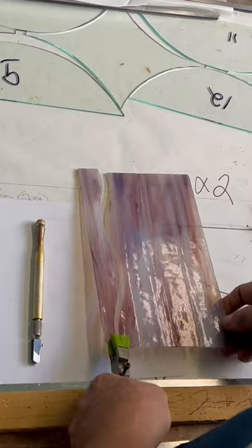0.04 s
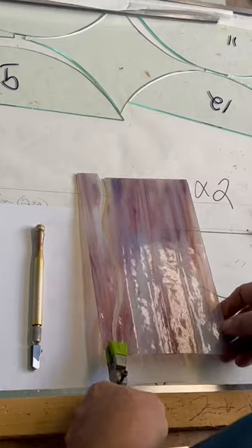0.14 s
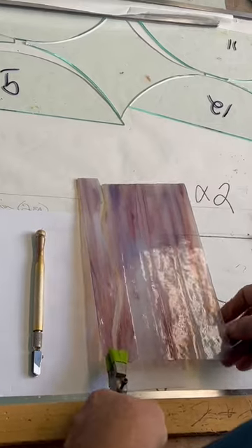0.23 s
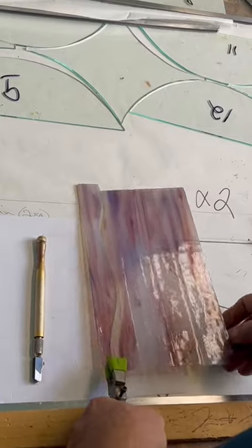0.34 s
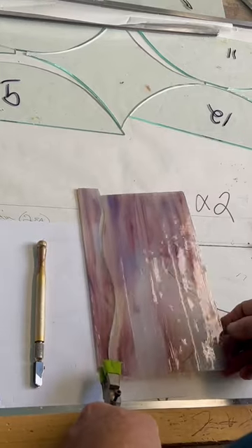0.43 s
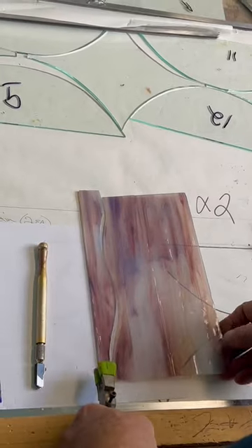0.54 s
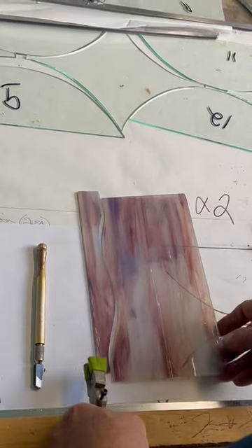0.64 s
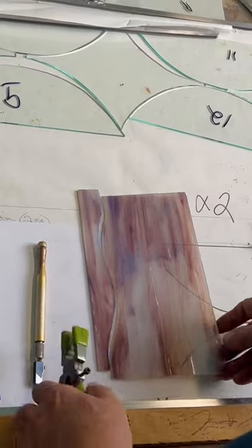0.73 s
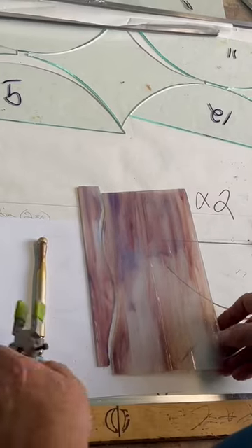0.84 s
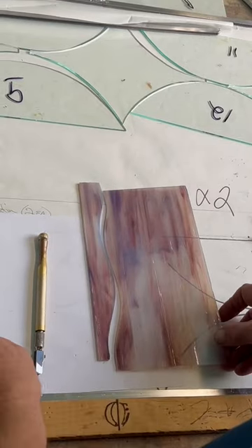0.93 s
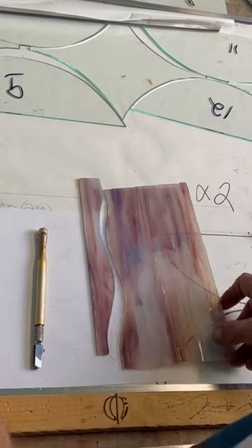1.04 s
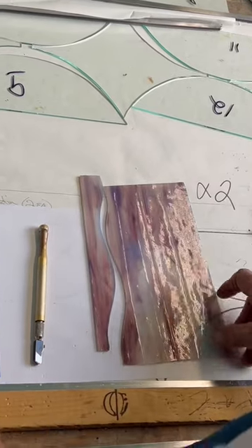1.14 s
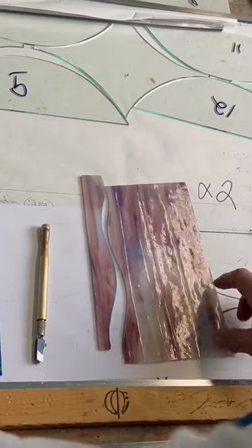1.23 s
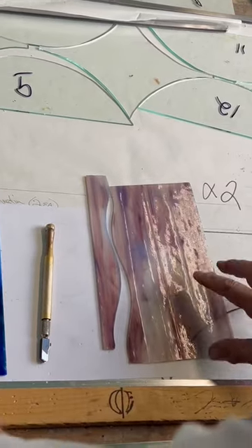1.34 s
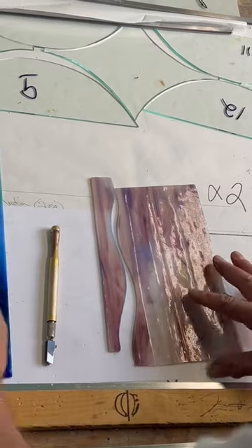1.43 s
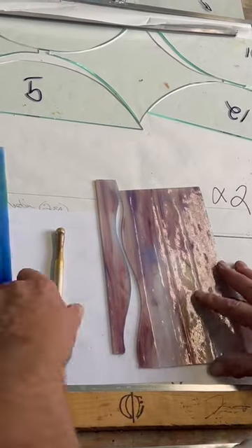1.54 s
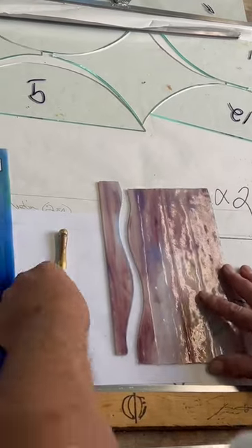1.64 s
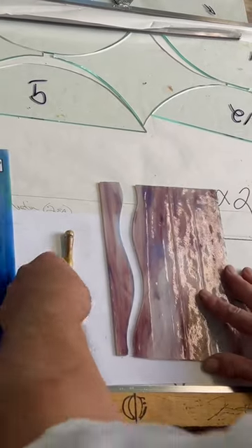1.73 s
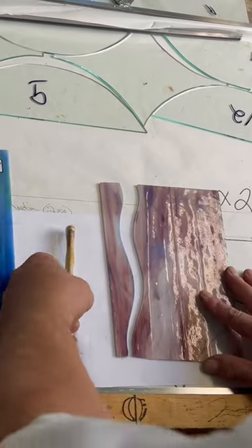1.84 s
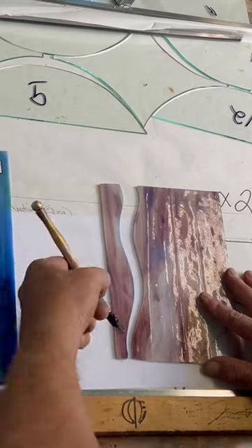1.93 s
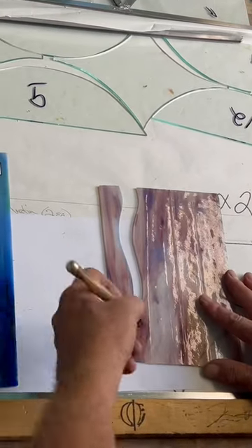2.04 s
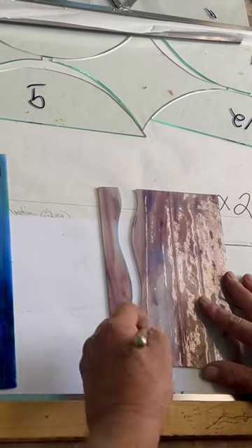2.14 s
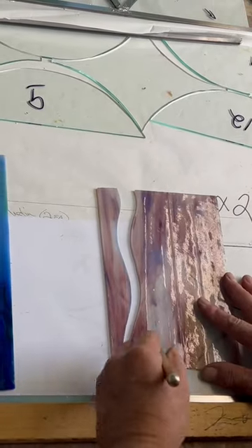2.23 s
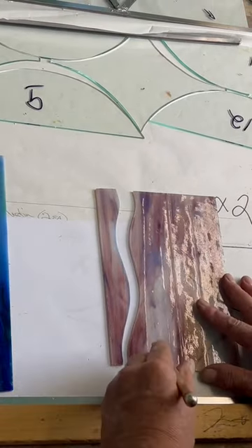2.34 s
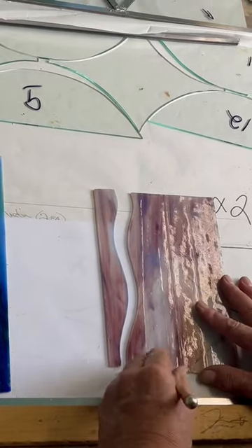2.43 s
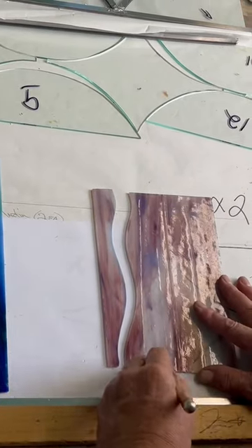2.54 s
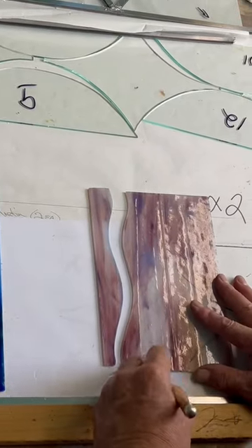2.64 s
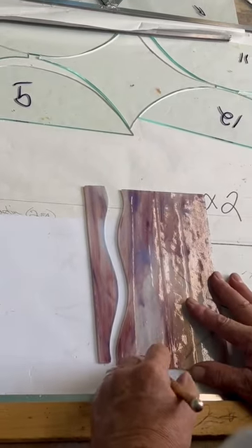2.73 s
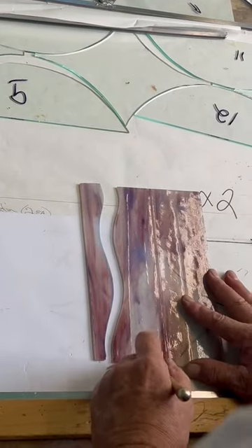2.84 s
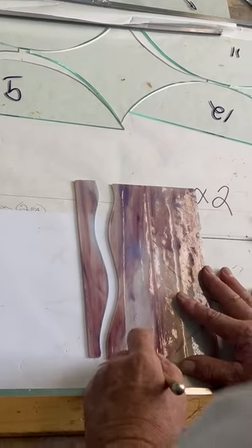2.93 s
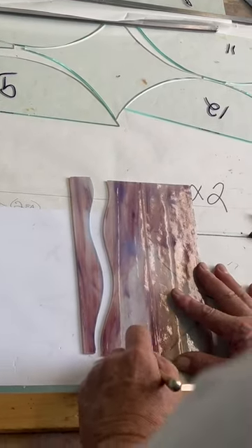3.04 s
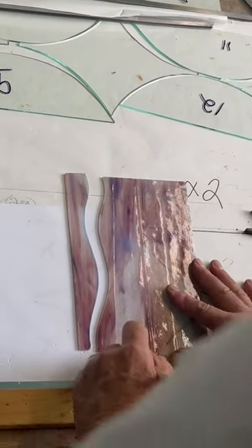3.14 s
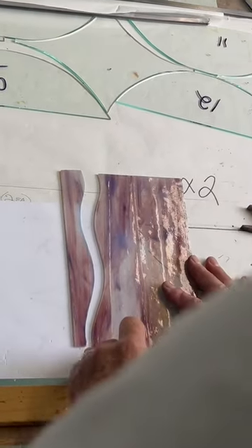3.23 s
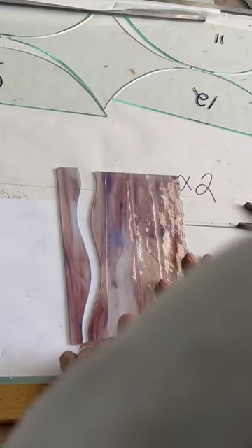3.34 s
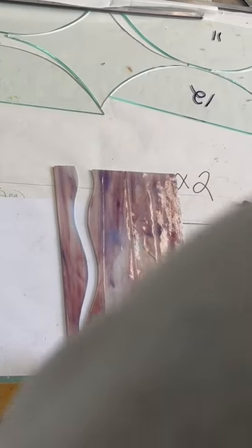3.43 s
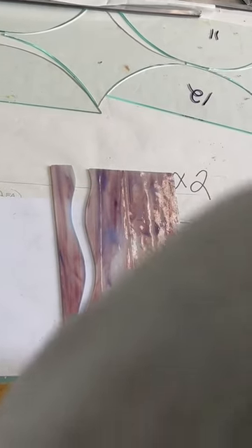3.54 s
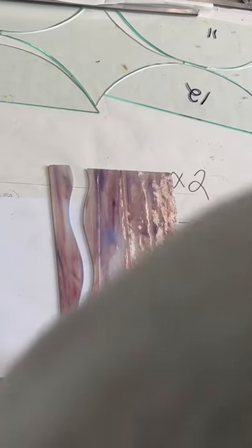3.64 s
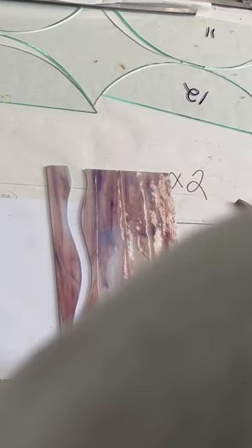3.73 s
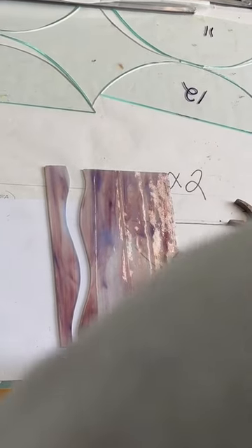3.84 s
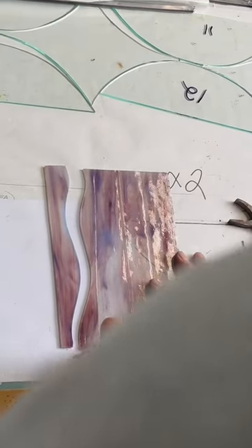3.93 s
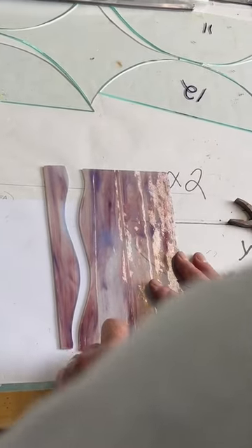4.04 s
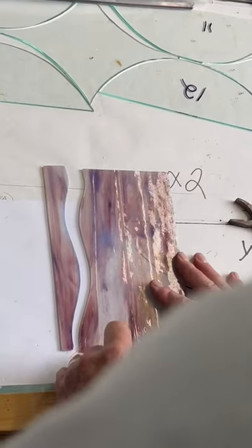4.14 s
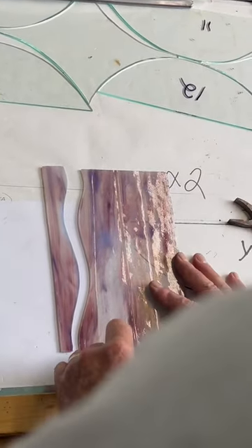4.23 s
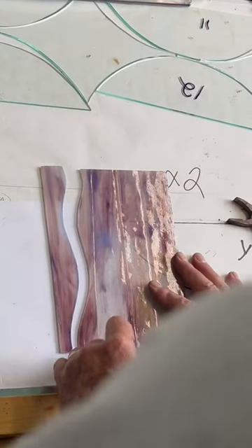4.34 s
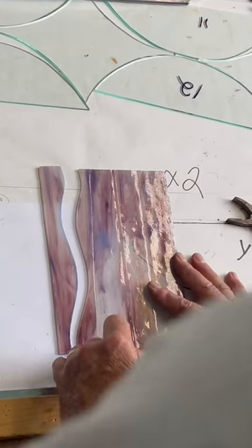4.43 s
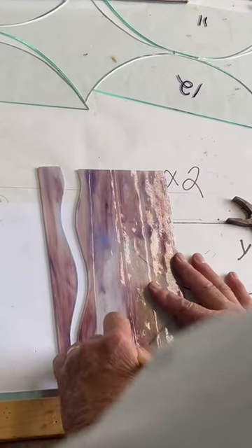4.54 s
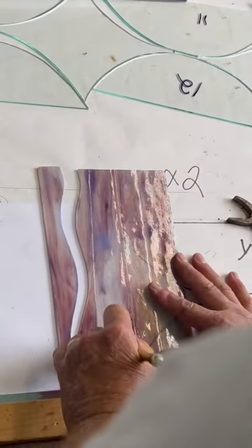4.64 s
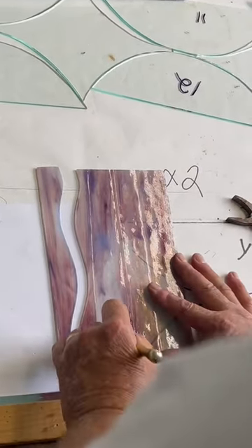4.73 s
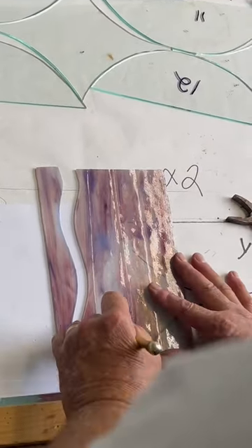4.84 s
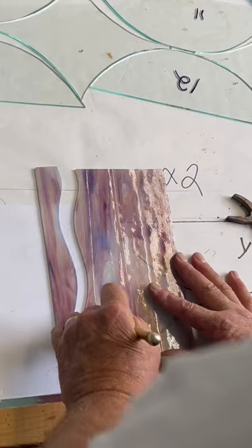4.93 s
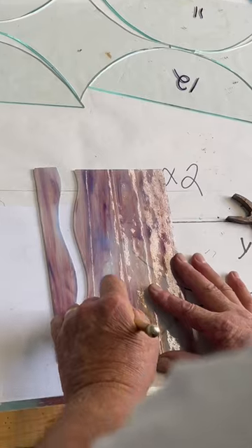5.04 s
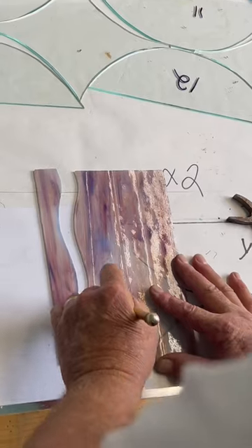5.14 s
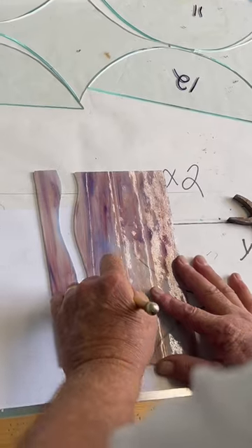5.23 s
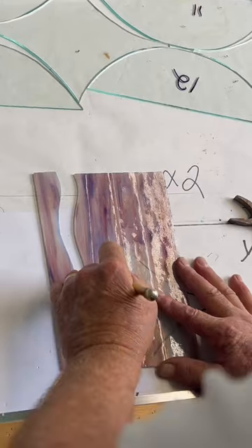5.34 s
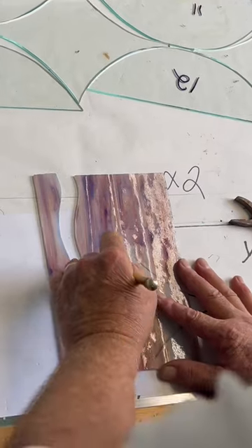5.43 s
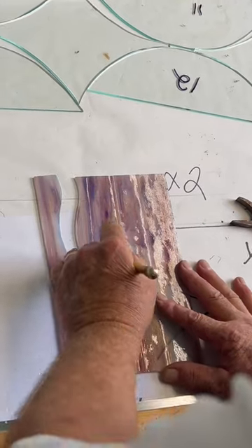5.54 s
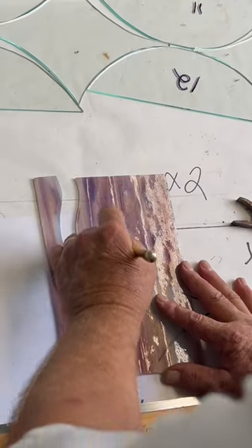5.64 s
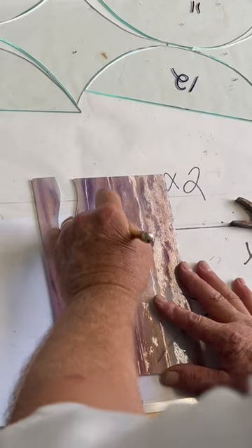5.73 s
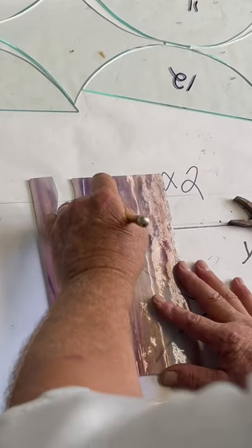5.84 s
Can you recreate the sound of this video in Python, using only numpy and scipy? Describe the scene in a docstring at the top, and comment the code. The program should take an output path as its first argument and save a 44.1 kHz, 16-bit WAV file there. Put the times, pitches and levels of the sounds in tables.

```python
"""Scoring stained glass

On a paper-covered wooden bench, steel pliers are put down and ring; the sheet slides, then drops flat
with a knock. A cutter is picked up and set on the edge with sharp clicks and one hard snap. Its wheel
is pushed across the sheet, crushing a fine score line: a gritty hiss, coloured by the modes of the
glass, over a rolling rumble. The small workshop echoes and hums low."""
import sys
import numpy as np
from scipy import signal
from scipy.fft import rfft, irfft
from scipy.io import wavfile
from scipy.ndimage import uniform_filter1d

SR = 44100
rng = np.random.default_rng(int(sys.argv[2]) if len(sys.argv) > 2 else 0)


def put_to_file(sound):
    """Save the sound as 16-bit audio at rate SR, in the file named by the first command-line argument."""
    columns = np.atleast_2d(sound).T  # one column per channel
    safe = np.clip(columns, -1, 1)
    whole_steps = np.round(safe * 32767)
    wavfile.write(sys.argv[1], SR, whole_steps.astype(np.int16))


N = 259308
TIME = np.arange(N) / SR
STROKE_START_S = 4.456   # the wheel bites


def from_db(db):
    """Decibels to gain."""
    return 10 ** (np.asarray(db) / 20)


def rms_one(x):
    """Scale to rms 1."""
    return x / np.sqrt(np.mean(x ** 2) + 1e-20)


def at_hz(points, hz):
    """Interpolate (f, value) points over log frequency."""
    f, value = np.transpose(points)
    return np.interp(np.log(np.maximum(hz, 1)), np.log(f), value)


def colour(x, spectrum):
    """Shape steady noise with a spectrum; rms 1."""
    gain = from_db(at_hz(spectrum, np.fft.rfftfreq(N, 1 / SR)))
    return rms_one(irfft(rfft(x) * gain, N))


def butter(x, kind, hz, order=2):
    """Butterworth low- or high-pass."""
    return signal.sosfilt(signal.butter(order, hz, kind, fs=SR, output="sos"), x + 1e-18)


def add(track, s, sound):
    """Mix a short sound in at time s."""
    part = track[round(s * SR):][:len(sound)]
    part += sound[:len(part)]


def ring(x, hz, t60_s):
    """One mode: a unit impulse starts a decaying sine of height 1."""
    r, w = from_db(-60 / (t60_s * SR)), 2 * np.pi * hz / SR
    return signal.lfilter([0, np.sin(w)], [1, -2 * r * np.cos(w), r * r], x + 1e-18)


def resonance(x, hz, width_hz):
    """Band-pass, peak gain 1."""
    r, w = np.exp(-np.pi * width_hz / SR), 2 * np.pi * hz / SR
    numerator = np.array([1, 0, -1]) * (1 - r * r) / 2
    return signal.lfilter(numerator, [1, -2 * r * np.cos(w), r * r], x + 1e-18)


def diffuse(size):
    """White stereo noise, alike left and right in the bass and top treble."""
    # diffuse-field coherence: f/Hz, left-right correlation
    coherence = [(60, 0.99), (150, 0.96), (300, 0.77), (600, 0), (6800, 0), (8500, .7), (11000, 1)]
    mid, side = rfft(rng.standard_normal((2, size)))
    alike = np.clip(at_hz(coherence, np.fft.rfftfreq(size, 1 / SR)), -1, 1)
    return irfft(np.sqrt((1 + alike) / 2) * mid + np.sqrt((1 - alike) / 2) * side * [[1], [-1]], size)


def grains(per_s, spread_db):
    """Tiny impulses of uneven size at random moments; rms 1."""
    sizes = from_db(spread_db * np.minimum(rng.exponential(1, N), 5)) * rng.standard_normal(N)
    return rms_one(sizes * (rng.random(N) < per_s / SR))


def rub(s, length_s, attack_s=0.007, release_s=0.099):
    """Envelope of one rub: rise, hold, decay."""
    rise = np.clip((TIME - s) / attack_s, 0, 1)
    return rise * np.exp(-np.maximum(TIME - s - length_s, 0) / release_s)


def struck(touches, modes, reach_oct, spill=0):
    """Every touch rings the same modes; the contact point favours those near one frequency."""
    s, db, favoured_hz = np.transpose(touches)
    onsets = np.round(s * SR).astype(int)
    out = np.zeros(N)
    for hz, mode_db, t60_s in modes:
        coupling = spill + 1 / (1 + (np.log2(hz / favoured_hz) / reach_oct) ** 2)
        impulses = np.bincount(onsets, from_db(db + mode_db) * coupling, N)
        out += ring(impulses, hz, t60_s)
    return butter(out, "high", hz=800)   # the rings carry no bass


def background(hum_db=-50, air_db=-72):
    """Low hum and faint air noise fill the room."""
    # hum spectrum: f/Hz, level/dB
    hum = [(18, -21), (28, -7.5), (45, -5), (65, -3.5), (85, -20.5), (111, 1.5), (140, -14), (185, -17.5),
           (240, -30), (320, -24.5), (450, -42), (700, -36.5), (2000, -81.5)]
    # air spectrum: f/Hz, level/dB
    air = [(150, 3), (400, 2.5), (800, -7), (1400, -9.5), (2500, -20.5), (5000, -22.5), (9000, -24),
           (12000, -36), (16000, -48)]
    return from_db(hum_db) * colour(diffuse(N), hum) + from_db(air_db) * colour(diffuse(N), air)


def sliding(gain_db=-3):
    """Paper fibres catch and let go under glass and tools."""
    # slides: t/s, length/s, level/dB
    slides = [(0, 0.58, -64), (.885, 0.18, -63), (1.07, 0.03, -60), (1.535, 0.28, -64.5),
              (2.43, 0.057, -58), (3.22, 0.2, -67)]
    # paper friction spectrum: f/Hz, level/dB
    spectrum = [(300, 20.5), (1500, 12.5), (3000, 3.5), (5000, 1.5), (8000, -7.5), (11000, -8),
                (16000, -13.5)]
    level = sum(from_db(db + gain_db) * rub(s, length_s) for s, length_s, db in slides)
    return level * colour(grains(per_s=13000, spread_db=2.5), spectrum)


def pliers():
    """Light touches set the steel pliers ringing."""
    # touches: t/s, level/dB, favoured f/Hz
    clinks = [(.274, -41, 1650), (.2745, -58, 1200), (.3275, -50, 4840), (.328, -39, 1850),
              (.478, -43, 1420), (.479, -64, 2700), (.486, -41, 1130), (.497, -42, 1420), (.522, -46, 1600),
              (.932, -56.5, 1540), (.975, -47, 1820), (1.114, -43.5, 1550), (1.121, -57, 3430)]
    # plier modes: f/Hz, level/dB, t60/s
    modes = [(1122, 4.5, 0.096), (1414, 4, 0.1), (1660, 2, 0.028), (2005, -6, 0.067), (2240, -4, 0.086),
             (2690, 5, 0.11), (3430, 2, 0.12), (4140, -7, 0.13), (4840, -0.5, 0.062), (5500, -6, 0.11),
             (7500, -11, 0.082)]
    return struck(clinks, modes, reach_oct=0.12, spill=0.054)


def snap(spectrum, tilt_db_per_oct, size=2048):
    """Minimum-phase pulse with a tilted spectrum; energy 1."""
    hz = np.maximum(np.fft.rfftfreq(size, 1 / SR), 500)
    magnitude = from_db(at_hz(spectrum, hz) + tilt_db_per_oct * np.log2(hz))
    cepstrum = irfft(np.log(magnitude))
    cepstrum[size // 2:] = 0
    pulse = irfft(np.exp(2 * rfft(cepstrum)))
    return pulse / np.linalg.norm(pulse)


def clicks(chip_db=-4, chip_s=0.0011, size=600):
    """Steel and glass edges snap into place with a millisecond of chipping."""
    # edge contacts: t/s, level/dB, tilt/(dB/oct)
    contacts = [(0.3266, -34, -4.5), (.351, -38, 0.5), (.882, -38.5, 3), (1.0843, -43, -0.5),
                (1.115, -35, -3.5), (1.121, -37.5, -5), (1.141, -52, -8), (1.248, -41, 6),
                (1.3099, -12, -7.5), (1.329, -31, 4.5), (1.534, -34.5, 0), (1.6838, -26.5, 6.5),
                (2.1195, -48.5, -3.5), (2.3385, -41, -3.5), (2.4207, -29.5, -1), (2.558, -37.5, -2),
                (2.593, -35, -4.5), (2.66, -41, -7), (2.799, -45, -4), (3.369, -9, 4),
                (3.3724, -4.5, -12.5), (3.9177, -28, -6), (4.266, -31.5, 4.5), (4.405, -29.5, -0.5),
                (4.429, -31, 9), (4.4572, -26, -4)]
    # click spectrum: f/Hz, level/dB
    spectrum = [(200, -36), (800, -5.5), (1500, -1), (2200, -0.5), (3000, -5), (4000, -2.5), (6000, -5),
                (9000, -4), (12000, -10.5), (15000, -6.5)]
    out, t = np.zeros(N), np.arange(size) / SR
    for s, db, tilt in contacts:
        chips = (t == 0) + from_db(chip_db) * rng.standard_normal(size) * np.exp(-t / chip_s)
        pulse = np.convolve(chips, snap(spectrum, tilt))
        add(out, s, 2 * from_db(db) * pulse / np.linalg.norm(pulse))
    return butter(out, "high", hz=600)   # small edges radiate no bass


def swing(hz, cycles, size=4000):
    """A sine that falls to 1/e in the given cycles."""
    t = np.arange(size) / SR
    return np.sin(2 * np.pi * hz * t) * np.exp(-hz * t / cycles)


def knocks(thud_lag_s=0.00351, settle_lag_s=0.01417, settle_db=-8.5, bench_db=-27):
    """Blunt contact; the board gives way with a thud, settles lower and weaker, and rings on."""
    # blows: t/s, level/dB, contact f/Hz, thud over contact/dB, thud f/Hz
    blows = [(0.351, -29.5, 1060, 5.5, 273), (0.474, -31, 555, 6.5, 243), (0.485, -42, 925, 11, 325),
             (0.495, -33.5, 1190, 12.5, 333), (.805, -43.5, 794, 1.5, 275), (0.851, -45, 236, 6, 77.5),
             (1.1371, -38, 930, 20.5, 417), (1.3082, -23.5, 1350, 15.5, 528), (1.3231, -21, 1170, 10, 332),
             (1.341, -24.5, 1400, 5.5, 525), (1.36, -30.5, 1580, 0.5, 420), (1.533, -35.5, 366, 3, 123),
             (3.373, -5, 986, 2.5, 321), (3.3748, -11, 1600, -11, 520), (3.918, -44.5, 593, 7, 270),
             (5.596, -28, 325, -20, 106)]
    # bench modes: f/Hz, level/dB, t60/s
    modes = [(71, -27.5, 0.94), (115.6, -13.5, 0.23), (191, -29.5, 0.25), (300, -32.5, 0.2),
             (420, -28.5, 0.3), (530, -29.5, .2), (962, -23, 0.17), (1482, -27, 0.12), (1660, -24.5, 0.14)]
    push = np.zeros(N)
    for s, db, hz, thud_db, thud_hz in blows:
        thud_gain = from_db(db + thud_db)
        add(push, s, from_db(db) * swing(hz, cycles=1.33))
        add(push, s + thud_lag_s, thud_gain * swing(thud_hz, cycles=0.93))
        add(push, s + settle_lag_s, thud_gain * from_db(settle_db) * swing(0.6 * thud_hz, cycles=0.87))
    push = butter(push, "low", hz=1900, order=4)   # paper softens the blow
    push = butter(push, "high", hz=105)   # little deep bass in the blow
    bench = sum(from_db(db) * ring(push, hz, t60_s) for hz, db, t60_s in modes)
    return push + from_db(bench_db) * bench


def sheet_taps():
    """The sheet rings briefly as it lands or the cutter touches it."""
    # taps: t/s, level/dB, favoured f/Hz
    taps = [(.351, -48, 3200), (1.311, -35, 5260), (2.339, -73, 2220), (2.42, -41.5, 1490),
            (2.4215, -37.5, 4200), (2.558, -46, 2250), (2.594, -47, 2240), (2.659, -57.5, 4240),
            (3.37, -29.5, 3780), (3.917, -50, 1900)]
    # modes of the sheet on paper: f/Hz, level/dB, t60/s
    modes = [(1430, 3, 0.03), (1790, -2, 0.028), (2610, -4, 0.03), (3350, -2, 0.02), (3950, -2, 0.03),
             (4450, -1, 0.02), (5060, -4, 0.02), (5890, -2, 0.03), (7900, -3, .015), (9100, -1, 0.015)]
    return struck(taps, modes, reach_oct=0.77)


def squeaks(waver=0.01):
    """Steel sticks and slips on glass, feeding single modes of wavering pitch."""
    # squeak tones: t/s, length/s, level/dB, f/Hz
    tones = [(1.041, 0.029, -57, 1130), (1.044, .04, -61, 1660), (1.043, 0.035, -56, 1380),
             (1.073, 0.03, -47, 2635), (1.081, 0.018, -45.5, 1097), (1.078, .018, -57, 4830)]
    pitch_ratio = 1 + waver * rms_one(uniform_filter1d(rng.standard_normal(N), 100))
    out = np.zeros(N)
    for s, length_s, db, hz in tones:
        arch = np.sin(np.pi * np.clip((TIME - s) / length_s, 0, 1))
        out += from_db(db) * arch * np.sin(2 * np.pi * hz * np.cumsum(pitch_ratio) / SR)
    return out


def rattles():
    """Loose glass and tools chatter after a hard knock and come to rest."""
    # jolts: t/s, level/dB, decay/s
    jolts = [(1.322, -32, 0.033), (3.379, -28, .025)]
    # chatter spectrum: f/Hz, level/dB
    spectrum = [(200, -17.5), (420, 0), (700, -1.5), (1150, -3), (1600, -3.5), (2100, -4.5), (2800, -21),
                (8000, -51.5)]
    level = sum(from_db(db) * (TIME > s) * np.exp(-np.maximum(TIME - s, 0) / decay_s)
                for s, db, decay_s in jolts)
    return level * colour(grains(per_s=1500, spread_db=1), spectrum)


def scraping(ramp_s=0.019):
    """The cutter's steel drags over paper or glass: a gritty swish that swells or fades."""
    # drags: t/s, length/s, end level/dB, swell/dB
    drags = [(1.526, 0.13, -61, 12), (1.649, 0.033, -46, 26), (2.417, 0.032, -53, -12),
             (3.212, 0.048, -68.5, 6.5)]
    # steel friction spectrum: f/Hz, level/dB
    spectrum = [(1500, -23), (3300, -13.5), (5000, -0.5), (6500, -1.5), (8700, 0.5), (10500, -8),
                (15000, -17)]
    level = np.zeros(N)
    for s, length_s, end_db, swell_db in drags:
        remaining = np.clip(1 - (TIME - s) / length_s, 0, 1)
        level += from_db(end_db - swell_db * remaining) * rub(s, length_s, ramp_s, ramp_s)
    return level * colour(grains(per_s=9000, spread_db=3.5), spectrum)


def brushing(gain_db=-4):
    """The hand rubs softly over the paper."""
    # hand strokes: t/s, length/s, level/dB
    strokes = [(1.53, 0.023, -52), (2.58, 0.021, -55), (2.75, 0.053, -58)]
    # skin friction spectrum: f/Hz, level/dB
    spectrum = [(200, 18), (750, 10.5), (1500, -13.5), (3000, -12.5), (8000, -28.5)]
    level = sum(from_db(db + gain_db) * rub(s, length_s) for s, length_s, db in strokes)
    return level * colour(rng.standard_normal(N), spectrum)


def cutter_head():
    """The cutter's head rings as it is set on the glass."""
    # touches: t/s, level/dB, favoured f/Hz
    touches = [(2.4205, -49.5, 6470), (2.594, -65.5, 6100)]
    # head modes: f/Hz, level/dB, t60/s
    modes = [(5480, -2, .2), (5660, -5, .14), (5810, 0, .22), (5970, -4, .14), (6300, -3, .17),
             (7620, -4, .16), (8620, -4, .14), (9100, 3, .17)]
    return struck(touches, modes, reach_oct=1)


def glass_ring(crush, count=100):
    """Dense plate modes swell and fade as the wheel travels, short waves faster; rms 1."""
    centres_hz, spacing_hz = np.linspace(1900, 15000, count, retstep=True)
    out = 0
    for hz, (detune, place) in zip(centres_hz, rng.random((count, 2))):
        nodes_per_s = 2.22 * np.sqrt(hz / 3000)
        standing_wave = np.sin(np.pi * (nodes_per_s * TIME[:len(crush)] + 2 * place))
        out += resonance(crush * standing_wave, hz + spacing_hz * detune, width_hz=40)
    return rms_one(out)


def scoring(full_cm_per_s=12.47, run_up_s=0.83, judder_db=2.5, ring_db=-5.5,
            hiss_db=-46, rumble_db=-44.5):
    """The wheel crushes tiny chips and rumbles over ripples; sheet modes swell at their antinodes."""
    # rolling spectrum: f/Hz, level/dB
    roll_spectrum = [(40, -7), (70, 8.5), (115, 4), (170, -5), (290, -2), (400, -15), (500, -7), (700, -21),
                     (1500, -34)]
    # chipping spectrum: f/Hz, level/dB
    crush_spectrum = [(300, -6.5), (600, 0), (1000, -3.5), (1350, -3), (2400, 2), (3100, -4.5), (3900, -1),
                      (5500, -4), (7200, -5.5), (8500, 1), (10000, -11.5), (11300, -5), (12300, -8),
                      (14000, -6.5), (16000, -11)]
    # strongest sheet modes: f/Hz, width/Hz, level/dB, antinode along the cut/cm, reach/cm
    modes = [(1350, 160, 3.5, 0.61, 4.5), (1980, 140, 3.5, 7.2, 1.6), (2570, 63, -9, 1.3, 2.5),
             (2720, 120, 12, 10, 1), (3900, 200, 2, 3.1, 0.7), (3800, 180, 4.5, 9.5, 1.3),
             (4170, 130, 10, 7.4, 0.82), (4400, 420, 0, 12.1, 1.7), (5240, 410, 6, 6.2, 0.97),
             (5190, 370, 7.5, 8.6, 1), (6100, 110, 7, 2.2, 1.4), (6070, 800, 7, 5.16, 0.37),
             (7000, 1200, 3, 10.65, 1.5), (8350, 110, 9.5, 4.55, 0.43), (8720, 120, 6, 11, 0.48),
             (8330, 130, 5.5, 12.8, 0.62), (9100, 730, 6, 12, 0.88), (9340, 66, 21.5, 0.41, 3.1),
             (9900, 250, -1, 5.2, .9), (9500, 250, 3, 12, 1.5), (10720, 140, 18.5, 10.6, 1.66),
             (11750, 130, 16.5, 5.1, 0.8), (12800, 240, 9, 3.3, 0.76), (13600, 170, 12, 7.5, 3.7),
             (14000, 170, 20, 3.2, 0.63), (13900, 150, 16, 4.7, .6), (14270, 150, 16, 9, 1.5),
             (14000, 150, 11, 0.71, .6), (15420, 170, 20, 0.89, 0.57), (15430, 170, 21, 3.2, 0.8),
             (15200, 100, 16, 8.4, 0.43), (15500, 250, 9, 12.5, 0.84)]
    rolling = TIME > STROKE_START_S
    speed = 1 - 0.46 * np.exp(-(TIME[rolling] - STROKE_START_S) / run_up_s)   # share of full speed
    travel_cm = full_cm_per_s * np.cumsum(speed) / SR
    ripples = colour(rng.standard_normal(N), roll_spectrum)[rolling]
    crush = colour(grains(per_s=20000, spread_db=1.73), crush_spectrum)[rolling]
    crush *= from_db(judder_db * ripples)   # bumps press the wheel in harder
    hiss = crush + from_db(ring_db) * glass_ring(crush)
    for hz, width_hz, db, antinode_cm, reach_cm in modes:
        nearness = np.exp(-((travel_cm - antinode_cm) / reach_cm) ** 2)
        hiss += from_db(db) * nearness * resonance(crush, hz, width_hz)
    out = np.zeros(N)
    out[rolling] = from_db(hiss_db) * speed ** 0.18 * hiss + from_db(rumble_db) * speed ** 1.77 * ripples
    return out


def along_the_cut(count=4):
    """Crossfades between the places the wheel passes, so its echoes keep changing."""
    passes_s, step_s = np.linspace(STROKE_START_S, TIME[-1], count, retstep=True)
    return [np.cos(np.pi / 2 * np.clip((TIME - s) / step_s, -1, 1)) for s in passes_s]


def room_response(early_db=-10, early_s=0.02, first_wall_s=0.0021, size=36000, bands=20):
    """Brief scatter from nearby things and a tail that dies band by band."""
    # room decay: f/Hz, t60/s
    decay = [(80, 0.54), (250, 0.27), (600, 0.44), (1200, 0.43), (2200, 0.47), (3200, 0.45), (5000, 0.36),
             (9000, 0.32), (16000, 0.27)]
    # echo spectrum: f/Hz, level/dB
    spectrum = [(60, -12.5), (150, 1), (350, -2.5), (700, -2.5), (1300, 7), (2100, 2.5), (3100, 3.5),
                (4200, -1.5), (6000, -1), (9000, -3.5), (16000, -21.5)]
    t, hz = np.arange(size) / SR, np.fft.rfftfreq(size, 1 / SR)
    noise = rfft(diffuse(size))
    onset = np.minimum(t / first_wall_s, 1) ** 2
    scatter = from_db(early_db) * np.exp(-t / early_s)
    centres_hz = np.geomspace(60, 16000, bands)
    out = 0
    for centre_hz, share in zip(centres_hz, np.eye(bands)):
        weight = at_hz(np.c_[centres_hz, share], hz)
        tail = from_db(-60 * t / at_hz(decay, centre_hz))
        band = irfft(noise * weight, size) * (tail + scatter) * onset
        band *= np.sqrt(2 * np.mean(weight ** 2) / np.sum(band ** 2))   # energy independent of decay
        out += from_db(at_hz(spectrum, centre_hz)) * band
    return out


def workshop(x, wet_db, places=(1,)):
    """Direct sound plus echoes; each place on the bench has its own."""
    echoes = sum(signal.fftconvolve([x * share], room_response(), axes=1)[:, :N] for share in places)
    return x + from_db(wet_db) * echoes


def scene():
    """The work on the bench, heard in the room."""
    steel = pliers() + squeaks()
    mix = workshop(knocks() + rattles(), wet_db=0.5)
    mix += workshop(clicks(), wet_db=6)
    mix += workshop(steel, wet_db=-8.5)
    mix += workshop(sheet_taps() + cutter_head(), wet_db=-3.5)
    mix += workshop(sliding() + brushing() + scraping(), wet_db=1.5)
    mix += workshop(scoring(), wet_db=3, places=along_the_cut())
    return mix + background()


def record(dry, ceiling=1.2, cutoff_hz=15800):
    """Two microphone ports differ in phase and presence; peaks are rounded, the top is cut."""
    # port phase: f/Hz, lead of the left/rad
    port_phase = [(0, 0), (4500, 1), (7500, .6), (8500, 0), (10200, -3.14), (12000, -6.28), (13750, -9.42),
                  (15500, -12.57), (17000, -13)]
    lead_rad = np.interp(np.fft.rfftfreq(N, 1 / SR), *np.transpose(port_phase))
    left = irfft(rfft(dry[0]) * np.exp(1j * lead_rad), N)
    ports = np.array([left, dry[1]])
    ports += [[0.45], [-0.45]] * resonance(ports, hz=5040, width_hz=3400)   # peak left, dip right
    rounded = ceiling * np.tanh(ports / ceiling)
    return signal.sosfilt(signal.ellip(10, 0.1, 80, cutoff_hz, fs=SR, output="sos"), rounded)


dry = scene()
out = record(dry)
put_to_file(out)
```